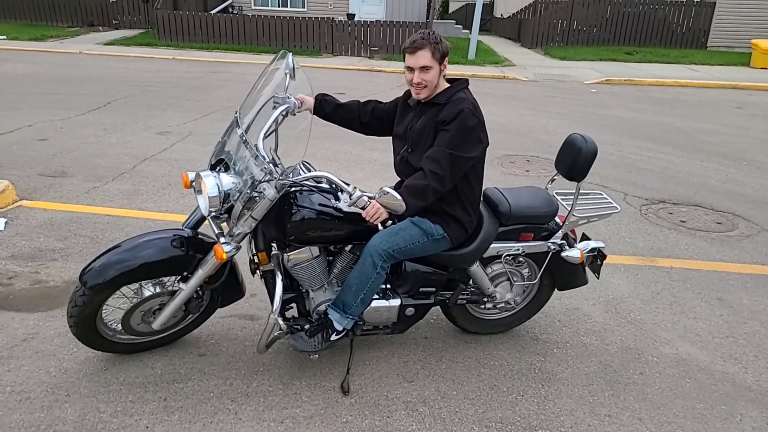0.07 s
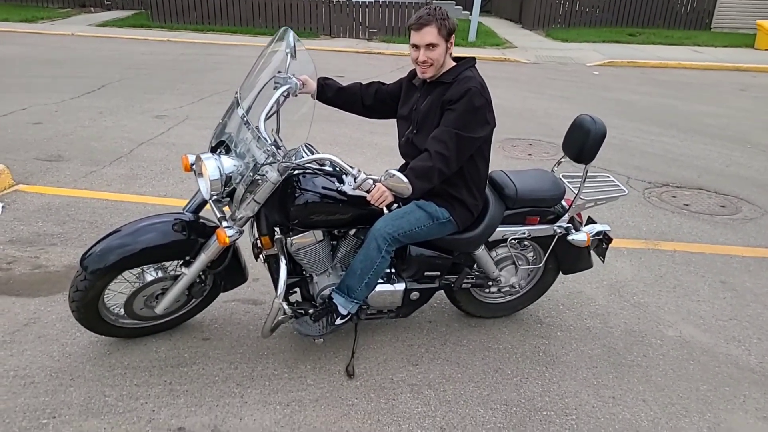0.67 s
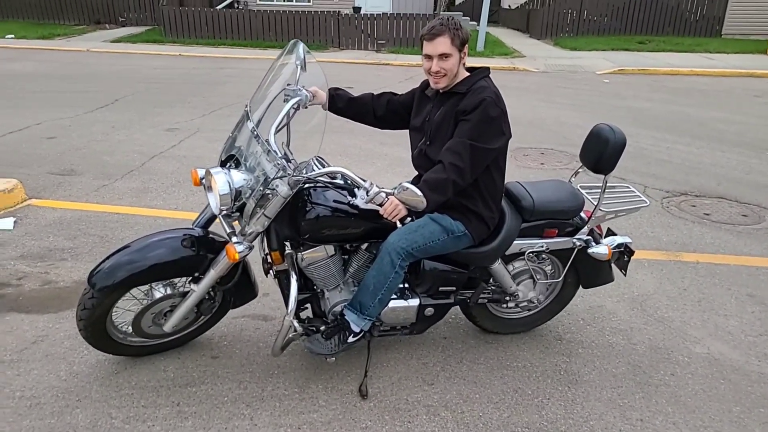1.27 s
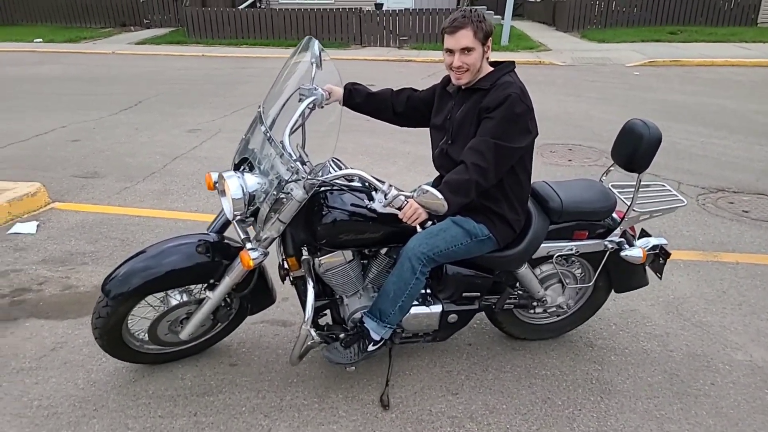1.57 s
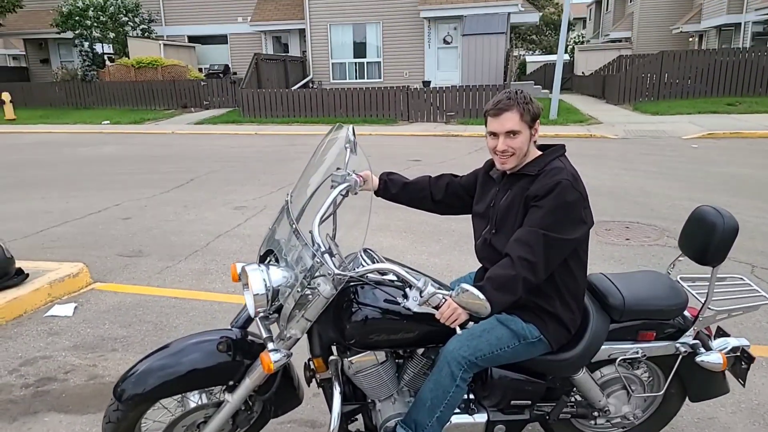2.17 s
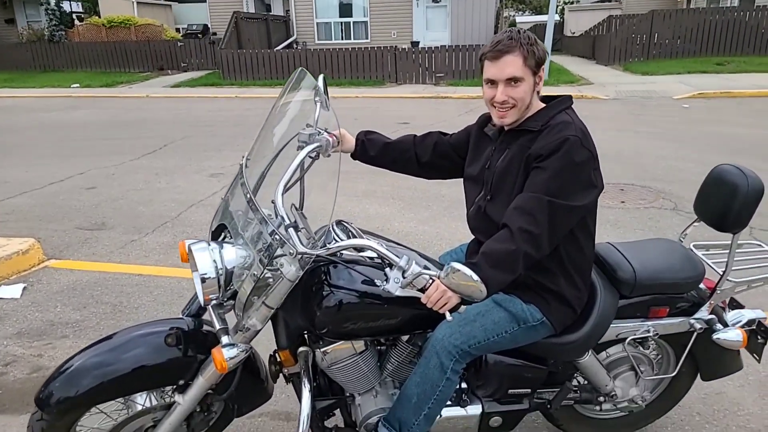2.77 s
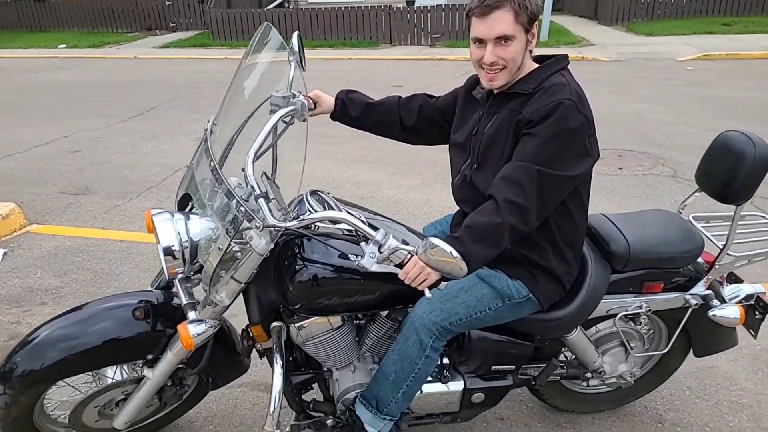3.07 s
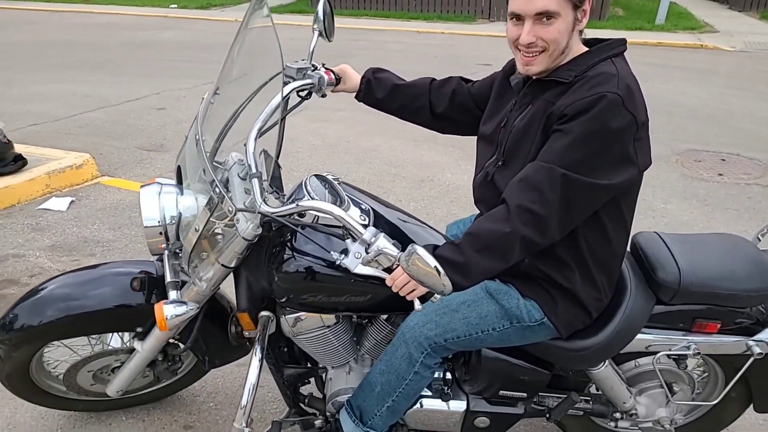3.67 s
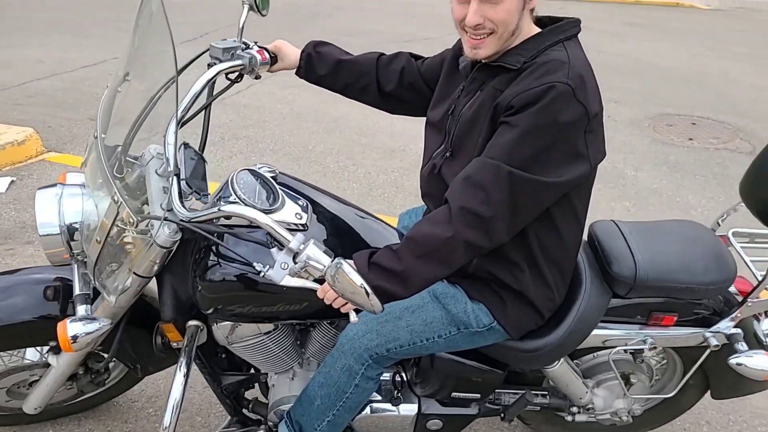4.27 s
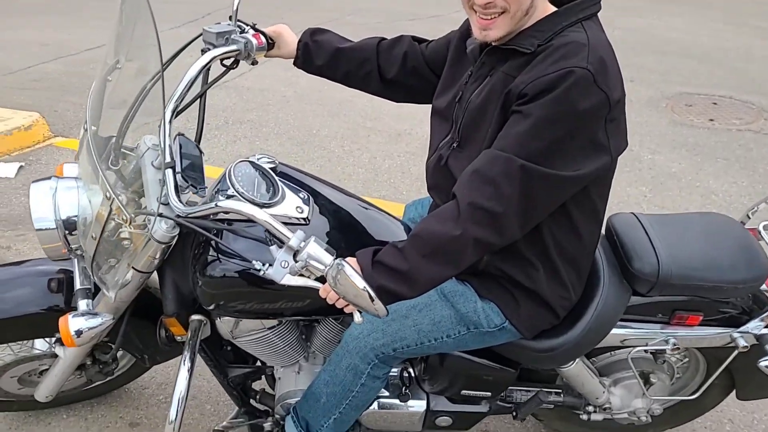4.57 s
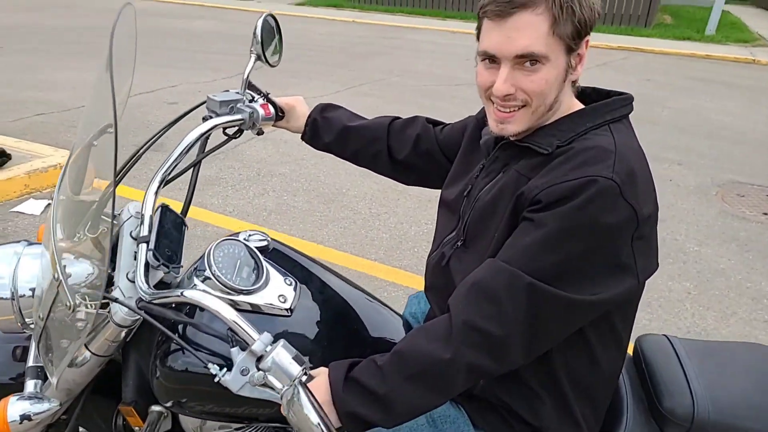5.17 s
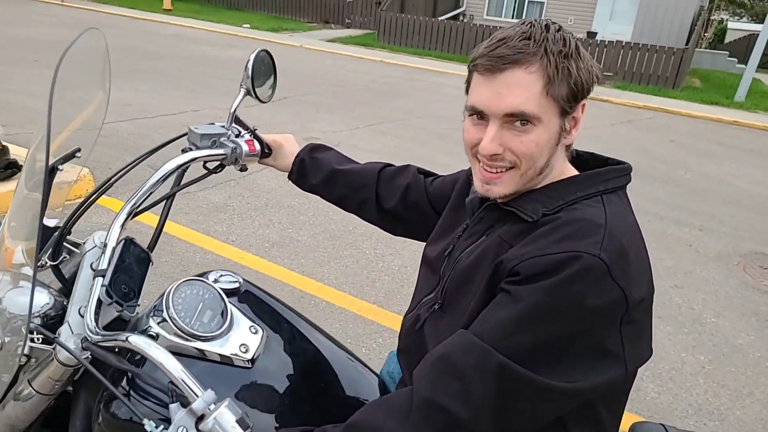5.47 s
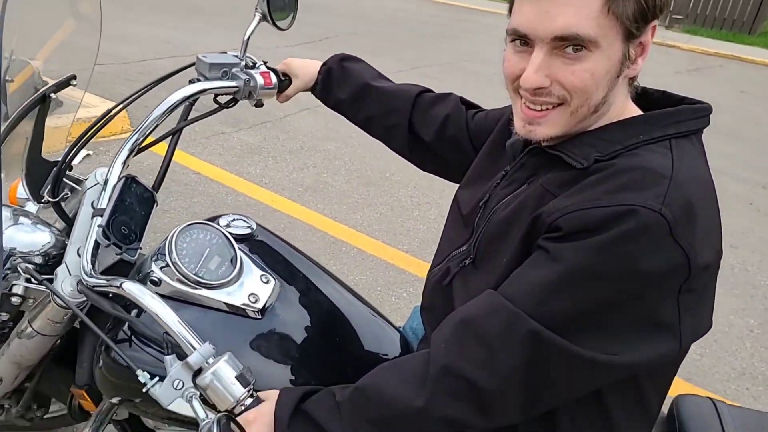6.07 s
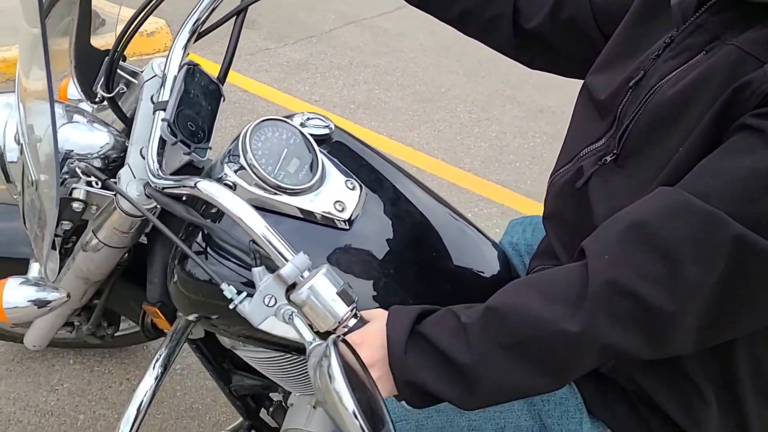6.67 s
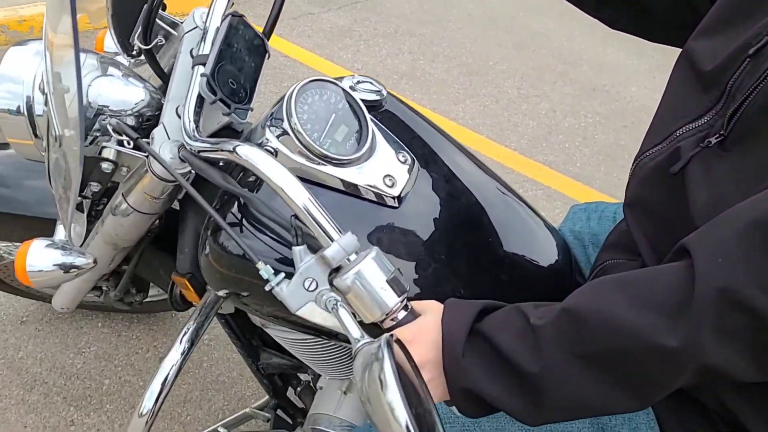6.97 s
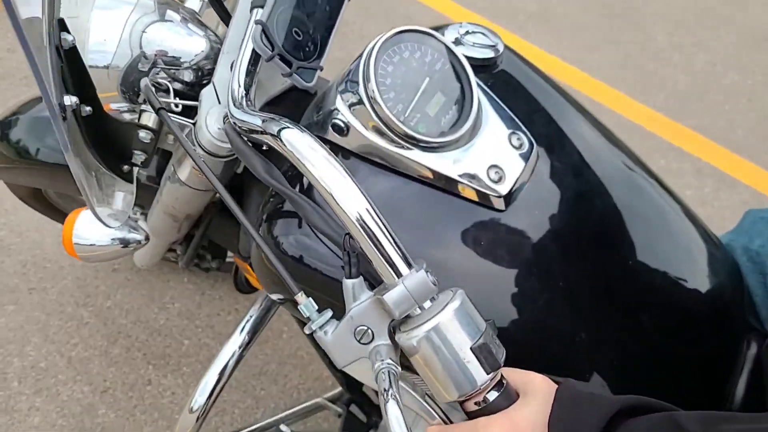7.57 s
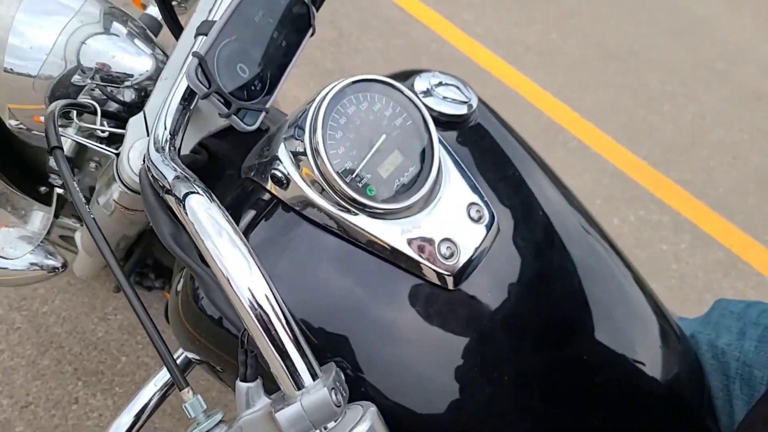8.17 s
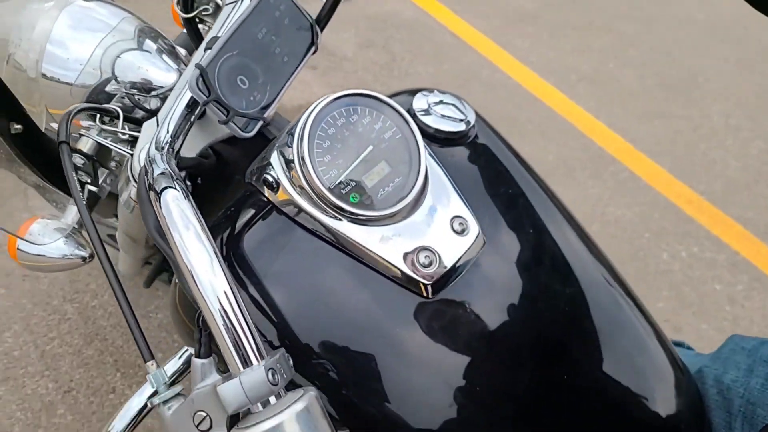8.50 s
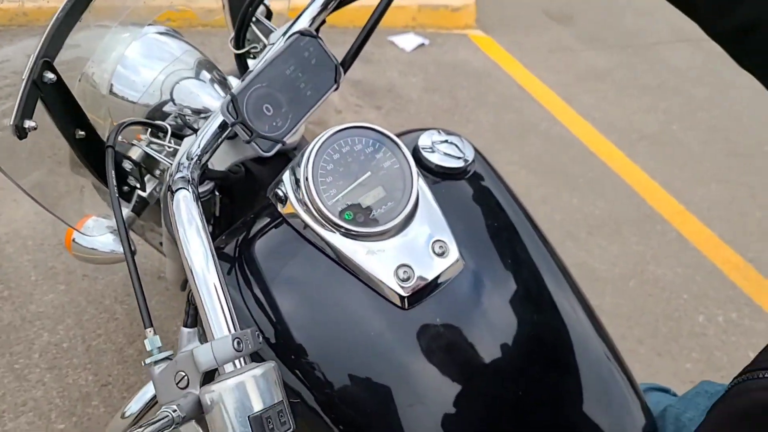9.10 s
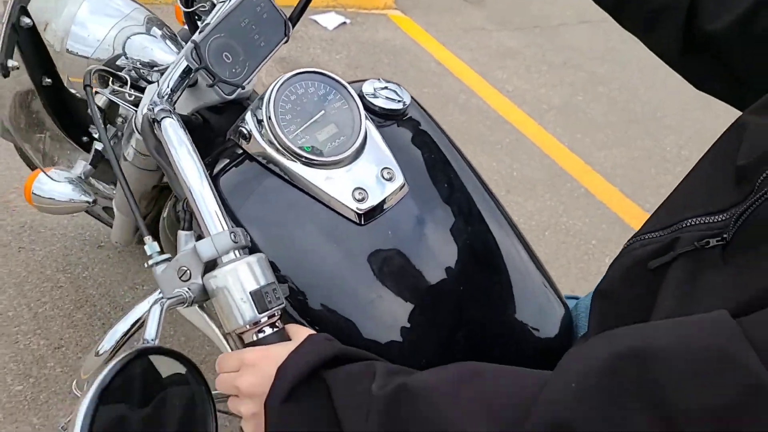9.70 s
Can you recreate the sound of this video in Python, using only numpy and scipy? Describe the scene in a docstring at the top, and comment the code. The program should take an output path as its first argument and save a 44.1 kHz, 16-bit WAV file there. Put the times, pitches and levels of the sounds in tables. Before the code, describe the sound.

A parked motorcycle is revved again and again close by outdoors, its deep thumping engine falling back toward a clattering idle between blips.

```python
"""A parked V-twin motorcycle, close by in an open lot. It coasts down from 2500 rpm, takes two long
throttle blips (0.8 s, 2.2 s), sinks to idle, takes five quick ones (4.0-5.6 s), then four spaced ones.
Two unevenly spaced cylinders thump into the muffler. In each blip the air box gulps and gas rushes;
then the throttle shuts and the pipes bark as the revs fall. Valves and gears clatter throughout,
while the listener wanders from the side of the bike to the handlebar."""
import sys
import numpy as np
from scipy import signal
from scipy.fft import rfft, irfft
from scipy.io import wavfile
from scipy.ndimage import uniform_filter1d

SR = 44100
rng = np.random.default_rng(int(sys.argv[2]) if len(sys.argv) > 2 else 0)


def output_pcm(signal):
    """Save a mono or channel-first signal as 16-bit PCM at the path in sys.argv[1].

    Samples are clipped to [-1, 1] before scaling.
    """
    pcm = np.clip(np.atleast_2d(signal).T, -1, 1) * 32767
    wavfile.write(sys.argv[1], SR, np.round(pcm).astype(np.int16))


N = 438354
TIME = np.arange(N) / SR
IDLE_RPM = 1324.8

# throttle twists: open t/s, shut t/s, first opening/0-1, last opening/0-1, bite/dB (scaled per layer)
THROTTLE_BLIPS = [(.763, 1.244, .7, .502, 0), (2.237, 3.0, .555, .429, 0), (4.049, 4.224, .616, .581, 0),
                  (4.465, 4.685, .802, .247, 1), (4.794, 4.96, .157, .073, 0),
                  (5.056, 5.298, .817, .865, 5), (5.41, 5.638, .838, .374, -1),
                  (6.583, 6.839, .702, .764, 1), (7.109, 7.418, .514, .703, 0),
                  (8.256, 8.607, .581, .827, 0), (9.39, 9.748, .852, .807, 0)]
# single hard firings: t/s, boost/dB (more in the bark)
HARD_FIRINGS = [(.317, 5), (.468, 5), (1.647, 2), (1.727, 2.5), (1.763, 1.5), (1.971, 3.5), (3.635, 3.5),
                (4.416, 4.5), (6.147, 2), (6.205, 2.5), (6.292, 4.5), (6.332, 3.5), (7.956, 1.5),
                (7.995, 4), (9.048, 3.5), (9.165, 2)]
# events in the four-stroke cycle: phase/cycles, level/dB
FIRING_PHASES = [(0.602, 0.5), (.993, 0)]
INTAKE_PHASES = [(0.431, 0), (0.842, 0.73)]
VALVE_PHASES = [(.13, -11), (0.361, -1.5), (.55, -0.5), (.76, -20), (.95, -6)]
# pulse strength: speed/rpm, throttle shut level/dB, throttle open level/dB
EXHAUST_LEVELS = [(1310, -20.5, -1), (1640, -20, -11.5), (1870, -12, -7), (2167, -8, -6.5), (2350, -6, -6),
                  (3240, -3, -5), (3240, -3.5, -8.5), (3850, -3.5, -7.5)]
INTAKE_LEVELS = [(1270, -24, -8), (1700, -22, -14), (2110, -19, -6), (2600, -15.5, -7), (3140, -13, -4),
                 (3700, -17, -9)]
# source spectra: f/Hz, relative level/dB
MUFFLER_EQ = [(12, -54.5), (20, -37.5), (35, -14), (50, 2.5), (65, 4.5), (85, 2), (110, 3), (140, -7),
              (180, -13), (250, -23), (400, -42), (700, -48), (2000, -100.5), (8000, -89.5)]
AIR_BOX_EQ = [(12, -32.5), (20, -36), (35, -26), (50, 3.5), (65, 9), (85, 4.5), (110, -5), (140, -0.5),
              (180, -6), (250, -16), (400, -28.5), (700, -42.5), (2000, -79.5), (8000, -89)]
GROWL_EQ = [(60, -29), (170, 8), (260, 3), (340, -1.5), (430, -8.5), (540, -11), (700, -17.5),
            (1200, -29), (4000, -54)]
PIPE_EQ = [(60, -31), (200, 0.5), (340, 8.5), (450, -3), (580, 6), (700, -3.5), (830, 5), (930, -5.5),
           (1070, -0.5), (1300, -12), (2400, -42), (3200, -40), (7000, -29), (15000, -55.5)]
GAS_EQ = [(40, 2.5), (120, 9.5), (200, 17), (300, 4.5), (460, -0.5), (600, 1.5), (720, 0.5), (900, -8),
          (1050, -0.5), (1300, -6.5), (1800, -9.5), (3500, -40)]
CLATTER_EQ = [(300, -2.5), (800, -16.5), (1300, 2), (1700, 1), (2000, -3.5), (2350, -2), (2700, -8),
              (3100, -12.5), (4500, -23), (9000, -35)]
HISS_EQ = [(1500, -32.5), (3000, -3), (4200, 0), (5500, -2), (7000, -4.5), (8000, -9.5), (8900, -16.5),
           (9700, -12), (10300, -13.5), (10800, -7), (11400, -14.5), (12100, -8.5), (13000, -12.5),
           (15800, -14)]
# shading by the bike, heard from its side and from the handlebar: f/Hz, relative level/dB
GAS_SIDE_EQ = [(200, -5.5), (330, -7.5), (450, 7), (560, 8.5), (700, 4), (1000, 4.5), (1400, -5)]
GAS_BAR_EQ = [(200, 3), (330, 4.5), (440, -1), (600, -6.5), (830, 4), (1020, 5), (1400, -6.5)]
CLATTER_SIDE_EQ = [(700, -3), (1150, 2), (1500, -5), (1850, 3.5), (2300, 2.5), (2800, 1.5), (3600, 2.5)]
CLATTER_BAR_EQ = [(700, -1), (1150, -1), (1500, 0), (1850, -1), (2300, -1.5), (2800, 1.5), (3600, 0)]
# listener's path and how openly each part is heard: t/s, position/0-1 (side to handlebar),
# air box/dB (tripled in the growl), gas/dB, clatter/dB, hiss/dB, case/dB, bark/dB
LISTENER_PATH = [(0, 0.15, 1.5, -5.5, 1, 0, -16, 3), (.8, 0.22, -0.5, 0.5, 1, -0.5, -7, 0),
                 (1.35, 0, -3.5, -4.5, 3.5, 3, -20, 3), (2, 0.34, 0, -0.5, -2, -1, -5.5, -5),
                 (2.9, 0.04, -2, -2.5, 3.5, 3, -0.5, 3), (3.6, 0.37, 1, -3, -2, -1.5, -7, -2),
                 (4.4, 0.67, -1.5, 2, -1, -0.5, 2, -1.5), (4.8, 0.82, -6, -0.5, 1.5, 1, 2.5, -1.5),
                 (5.6, 0.78, 2, 2, -2, -1.5, 6.5, 3), (6.3, 0.94, -5.5, -1.5, -5.5, -5.5, -8, 1.5),
                 (6.85, .8, -1, 1, -3.5, -2, 1.5, 1), (7.35, 0.5, 1.5, -3.5, -2, -.5, -0.5, -7),
                 (7.75, 0.6, 3, -1, -3, -4.5, 0, -9.5), (8.1, 0.72, 1, -0.5, -6.5, -6, -11, -5.5),
                 (8.7, 0.76, -0.5, 1, -4, -4.5, -1, 0), (9.3, 1, 3.5, -1.5, -6.5, -8, -10, -6.5),
                 (9.65, 0.73, 0.5, 1.5, 0, -3.5, -5, 14), (9.94, 0.7, 3, -5, -3.5, -3.5, -8, -3.5)]
PATH_COLUMNS = ("t", "position", "air_box", "gas", "clatter", "hiss", "case", "bark")
# stereo likeness of the noise: f/Hz, left-right correlation/0-1
STEREO_CORRELATION = [(100, 0.8), (250, 1), (500, 0.93), (1000, 0.54), (2000, 0.51), (4000, 0), (12000, 0)]


def exhaust(firings, level_db):
    """Each firing sets the muffler booming for a few swings."""
    return off_centre(-convolve(firings * amp(level_db), impulse(MUFFLER_EQ)), lag_s=0.00031)


def intake(gulps, level_db):
    """Each intake stroke sucks at the air box."""
    return off_centre(-convolve(gulps * amp(level_db), impulse(AIR_BOX_EQ)), lag_s=0.000011)


def air_box_growl(gulps, level_db):
    """Hard gulps drive the air box into a growl of clean harmonics."""
    return -convolve(gulps * amp(level_db - 17), impulse(GROWL_EQ))


def pipe_bark(firings, exhaust_db, overrun):
    """Hard firing fronts ring the pipes, most on a shut throttle and on pops."""
    fronts = np.roll(firings, int(.0018 * SR)) * amp(2.3 * rng.standard_normal(N))
    ringing = -convolve(fronts, impulse(PIPE_EQ)).repeat(2, axis=0)
    pipes = body_shading(tank_reflections(ringing, wet_db=3.5, decay_s=0.005), GAS_SIDE_EQ, GAS_BAR_EQ)
    return pipes * pop_gain() ** 1.47 * amp(1.435 * exhaust_db - 38.5 + 10 * overrun)


def gas_rush(firings, gulps, rpm, overrun):
    """Turbulent gas puffs with the intake and exhaust strokes."""
    suction = 0.98 + puffs(gulps, decay_s=0.0027)
    envelope = 1.1 + (1 - overrun) * suction + 1.8 * puffs(firings, decay_s=0.0032)
    gas = body_shading(convolve(stereo_noise() * envelope, impulse(GAS_EQ)), GAS_SIDE_EQ, GAS_BAR_EQ)
    return gas * amp(speed_db(rpm, idle_db=-40.5, doubling_db=8.5) - 2.1 * overrun)


def clatter(cycles, firings, rpm, load):
    """Valves seat and pistons knock over the whirr of gears and chains."""
    valves = puffs(strokes(cycles, VALVE_PHASES, spread_db=7.5, jitter_s=0.00059), decay_s=0.0067)
    envelope = 0.46 + 0.84 * valves + 1.18 * puffs(firings, decay_s=0.0099)
    metal = convolve(stereo_noise() * envelope, impulse(CLATTER_EQ))
    metal = tank_reflections(metal, wet_db=0.5, decay_s=0.0028)
    metal = body_shading(metal, CLATTER_SIDE_EQ, CLATTER_BAR_EQ)
    return metal * amp(speed_db(rpm, idle_db=-48, doubling_db=8.5) + 1.38 * load)


def hiss(cycles, firings, rpm, load):
    """Machinery sizzle: pulses with the firings, ticks with the valves."""
    ticks = puffs(strokes(cycles, VALVE_PHASES, spread_db=4, jitter_s=0.0012), decay_s=0.00036)
    envelope = 0.54 + 0.5 * ticks + 1.01 * puffs(firings, decay_s=0.006)
    sizzle = convolve(stereo_noise() * envelope, impulse(HISS_EQ))
    sizzle = tank_reflections(sizzle, wet_db=3, decay_s=0.0049)
    return sizzle * amp(speed_db(rpm, idle_db=-56, doubling_db=9.5) + 0.99 * load)


def case_ring(rpm, ring_hz=403.1, width_hz=14.8):
    """Shaking keeps one engine case resonance humming, even at idle."""
    t = np.arange(SR // 4) / SR
    mode = np.exp(-np.pi * width_hz * t) * np.sin(2 * np.pi * ring_hz * t)
    hum = unit_power(convolve(stereo_noise(), mode))
    return hum * amp(speed_db(rpm, idle_db=-43.5, doubling_db=1) + path("case"))


def trim_rattle(cycles, rpm):
    """Loose chrome ticks on the hardest shakes only."""
    shakes = strokes(cycles, FIRING_PHASES, spread_db=5.5, jitter_s=.005)
    ticks = stereo_noise() * puffs(np.maximum(shakes - 1.3, 0), decay_s=.0009)
    return highpass(ticks, order=3, cutoff_hz=8500) * amp(speed_db(rpm, idle_db=-66, doubling_db=6))


def crank(start_rpm=2515, pull_rpm_per_s=12500, drag_per_s=1.1616, twist_s=.04, step_hz=200):
    """Opening and rpm: the throttle pulls, drag slows, the idle jet holds the lowest speed."""
    t = np.arange(0, N / SR + 1 / step_hz, 1 / step_hz)
    throttle = np.zeros_like(t)
    for open_s, shut_s, first, last, _ in THROTTLE_BLIPS:
        twist = np.clip(np.minimum(t - open_s, shut_s + twist_s - t) / twist_s, 0, 1)
        throttle += twist * np.interp(t, [open_s, shut_s], [first, last])
    rpm = [start_rpm]
    for opening in throttle[:-1]:
        drag = drag_per_s * rpm[-1] * (1 - (IDLE_RPM / rpm[-1]) ** 12)
        rpm.append(rpm[-1] + (pull_rpm_per_s * opening - drag) / step_hz)
    return np.interp(TIME, t, throttle), np.interp(TIME, t, rpm)


def cylinder_load(throttle, fill_lag_s=0.021, full_load_opening=0.43):
    """Load, 0-1: cylinder filling trails the throttle."""
    pole = np.exp(-1 / (fill_lag_s * SR))
    return signal.lfilter([1 - pole], [1, -pole], np.clip(throttle / full_load_opening, 0, 1))


def throttle_bite(delay_s=0.12, width_s=0.084):
    """Brief level change in dB just after some twists."""
    return sum(db * np.exp(-((TIME - open_s - delay_s) / width_s) ** 2)
               for open_s, *_, db in THROTTLE_BLIPS)


def pop_gain(width_s=.012):
    """Gain that lifts single firings into pops."""
    return amp(sum(db * np.exp(-((TIME - at_s) / width_s) ** 4) for at_s, db in HARD_FIRINGS))


def strokes(cycles, phases, spread_db, jitter_s):
    """One uneven click each time the engine passes a listed phase."""
    clicks = np.zeros(N)
    for phase, db in phases:
        passes = np.arange(-1, int(cycles[-1]) + 1) + phase
        times_s = np.interp(passes, np.r_[-.1, cycles], np.r_[.002, TIME], left=-1, right=-1)
        timing, strength = rng.standard_normal((len(times_s), 2)).T
        at = np.round((times_s + jitter_s * timing) * SR).astype(int)
        inside = (at >= 0) & (at < N)
        clicks[at[inside]] += amp(db + spread_db * np.clip(strength, -2, 2))[inside]
    return clicks


def puffs(clicks, decay_s):
    """Swell and decay after each click."""
    age = np.arange(SR // 10) / SR / decay_s
    return convolve(clicks, 2 * (np.exp(-age) - np.exp(-2.5 * age)))[0]


def pulse_db(levels, rpm, load):
    """Pulse level at this speed, blended from shut to open by load."""
    speeds_rpm, shut_db, open_db = np.transpose(levels)
    return (1 - load) * np.interp(rpm, speeds_rpm, shut_db) + load * np.interp(rpm, speeds_rpm, open_db)


def speed_db(rpm, idle_db, doubling_db):
    """Level rising one step per doubling of speed."""
    return idle_db + doubling_db * np.log2(rpm / IDLE_RPM)


def off_centre(x, lag_s):
    """An off-centre source reaches left and right lag_s apart."""
    return np.array([np.interp(TIME + side * lag_s / 2, TIME, x[0]) for side in (-1, 1)])


def body_shading(x, side_eq, bar_eq):
    """The bike shades the spectrum as the listener comes round; unit power out."""
    position = np.clip(path("position"), 0, 1)
    from_side, from_bar = convolve(x, impulse(side_eq)), convolve(x, impulse(bar_eq))
    return unit_power((1 - position) * from_side + position * from_bar)


def tank_reflections(x, wet_db, decay_s, steps=30):
    """Tank and chrome echoes comb the sound, changing along the path; unit power out."""
    hop = N // steps + 1
    padded = np.pad(x, ((0, 0), (hop, 2 * hop)))
    combed, fade = np.zeros_like(padded), signal.windows.cosine(2 * hop)
    for start in np.arange(steps + 1) * hop:
        taps = echo_taps(SR // 40, decay_s)
        taps *= amp(wet_db) / np.linalg.norm(taps, axis=1, keepdims=True)
        taps[:, 0] = 1  # direct sound
        part = slice(start, start + 2 * hop)
        combed[:, part] += fade * signal.fftconvolve(padded[:, part], taps, axes=1)[:, :2 * hop]
    return unit_power(combed[:, hop:hop + N])


def lot_scatter(x, wet_db, decay_s):
    """Asphalt and bodywork scatter differently to left and right."""
    taps = highpass(echo_taps(SR // 16, decay_s), order=2, cutoff_hz=450)
    return x + amp(wet_db) * convolve(x, taps / np.linalg.norm(taps[0]))


def echo_taps(size, decay_s, gap_s=.0005):
    """Dense, decaying stereo echoes."""
    t = np.arange(size) / SR
    return rng.standard_normal((2, size)) * np.exp(-t / decay_s) * (t > gap_s)


def stereo_noise():
    """White noise, alike in the bass, unrelated in the treble."""
    left, other = rfft(rng.standard_normal((2, N)))
    likeness = np.clip(on_fft_bins(STEREO_CORRELATION, N), -1, 1)
    return irfft(np.array([left, likeness * left + np.sqrt(1 - likeness ** 2) * other]), N)


def impulse(eq, size=16384):
    """Minimum-phase response of a body with this spectrum, peak 1."""
    cepstrum = irfft(np.log(amp(on_fft_bins(eq, size))))
    cepstrum[1:size // 2] *= 2
    cepstrum[size // 2 + 1:] = 0
    ring = irfft(np.exp(rfft(cepstrum)))[:size // 2]
    return ring / abs(ring).max()


def unit_power(x, size=6000):
    """Holds power at 1 over a few engine cycles; keeps the beat within them."""
    power = uniform_filter1d(uniform_filter1d((x ** 2).mean(0), size), size)
    return x / np.sqrt(abs(power) + 1e-14)


def path(column):
    rows = np.asarray(LISTENER_PATH)
    return np.interp(TIME, rows[:, 0], rows[:, PATH_COLUMNS.index(column)])


def on_fft_bins(table, size):
    f_hz, values = np.transpose(table)
    return np.interp(np.log(np.fft.rfftfreq(size, 1 / SR) + 1), np.log(f_hz + 1), values)


def convolve(x, response):
    return signal.oaconvolve(np.atleast_2d(x), np.atleast_2d(response), axes=1)[:, :N]


def highpass(x, order, cutoff_hz):
    return signal.sosfilt(signal.butter(order, cutoff_hz, "high", fs=SR, output="sos"), x)


def amp(db):
    return 10 ** (np.asarray(db) / 20)


def scene():
    """Throttle sets speed and load; these time the strokes and drive the levels."""
    throttle, rpm = crank()
    load, bite_db = cylinder_load(throttle), throttle_bite()
    cycles = .066 + np.cumsum(rpm) / 60 / 2 / SR  # two turns per cycle
    rpm_per_s = uniform_filter1d(np.gradient(rpm) * SR, size=2000)
    overrun = np.clip(-rpm_per_s / 1800, 0, 1)  # 0 pulling, 1 coasting down
    firings = strokes(cycles, FIRING_PHASES, spread_db=2, jitter_s=0.00012) * pop_gain()
    gulps = strokes(cycles, INTAKE_PHASES, spread_db=1.9, jitter_s=0.00017)
    exhaust_db = pulse_db(EXHAUST_LEVELS, rpm, load) + 0.95 * bite_db
    intake_db = pulse_db(INTAKE_LEVELS, rpm, load) + 0.98 * bite_db + path("air_box")
    boom = exhaust(firings, exhaust_db) + intake(gulps, intake_db)
    boom = lot_scatter(boom, wet_db=3.5, decay_s=0.0044)
    growl = air_box_growl(gulps, intake_db + 2 * path("air_box"))
    gas = gas_rush(firings, gulps, rpm, overrun) * amp(path("gas") + 1.3 * bite_db)
    pipes = pipe_bark(firings, exhaust_db, overrun) * amp(path("bark") + 3 * bite_db)
    metal = clatter(cycles, firings, rpm, load) * amp(path("clatter") + 1.24 * bite_db)
    treble = hiss(cycles, firings, rpm, load) + trim_rattle(cycles, rpm)
    treble *= amp(path("hiss") + 1.3 * bite_db)
    return boom + growl + gas + pipes + metal + treble + case_ring(rpm)


def record(dry):
    """Right side slightly louder, peaks rounded, low-pass at 15.8 kHz."""
    panned = dry * amp([[-.45], [.45]])
    rounded = panned / (1 + panned ** 8) ** (1 / 8)
    lowpass = signal.firwin(511, 15800, window=("kaiser", 9), fs=SR)
    return signal.oaconvolve(rounded, lowpass[None], "same")


dry = scene()
out = record(dry)
output_pcm(out)
```